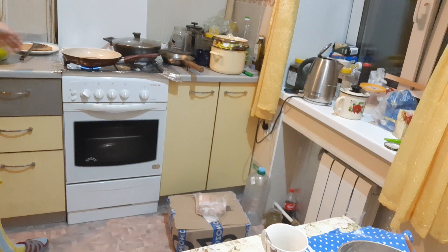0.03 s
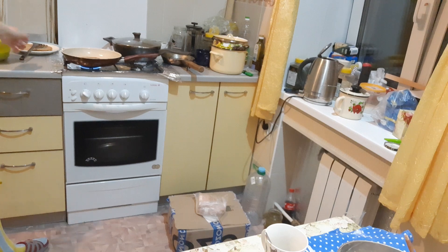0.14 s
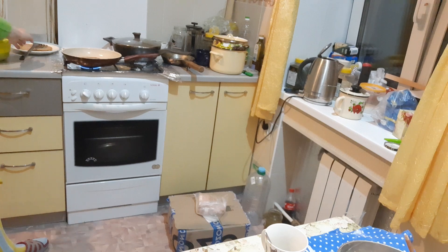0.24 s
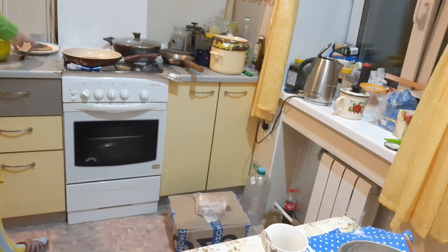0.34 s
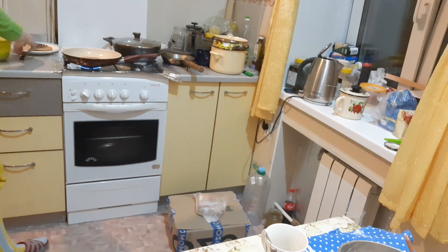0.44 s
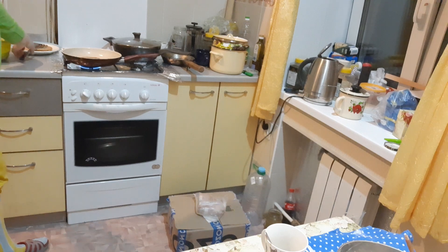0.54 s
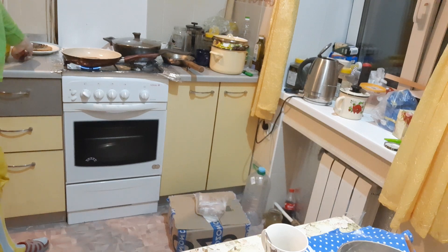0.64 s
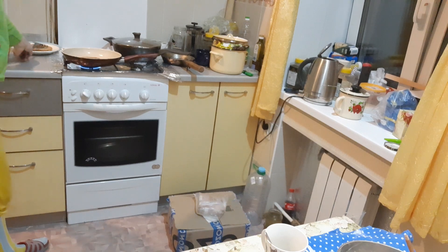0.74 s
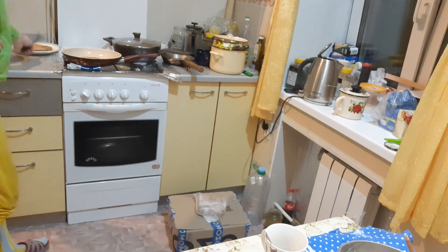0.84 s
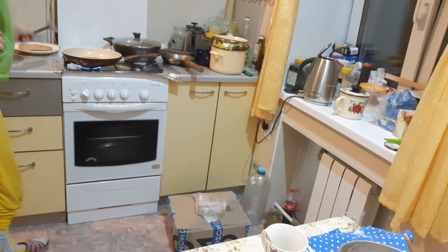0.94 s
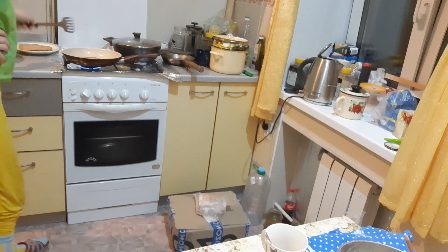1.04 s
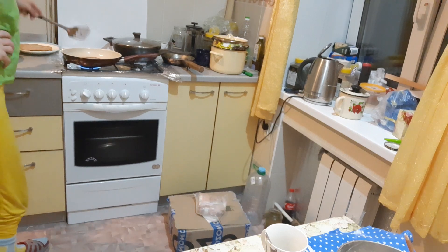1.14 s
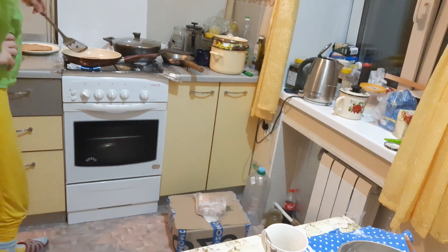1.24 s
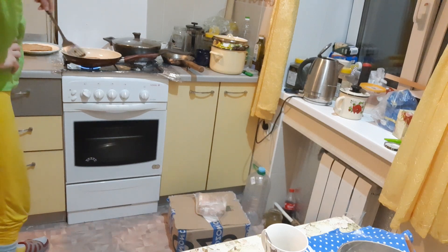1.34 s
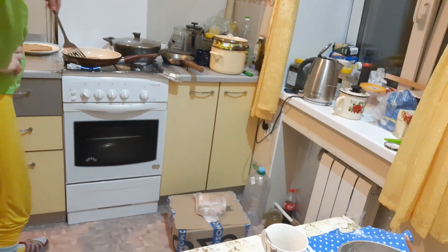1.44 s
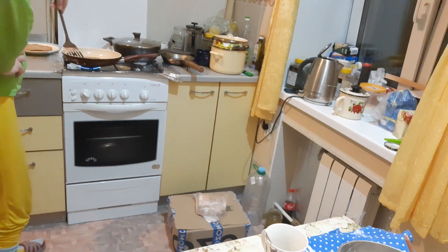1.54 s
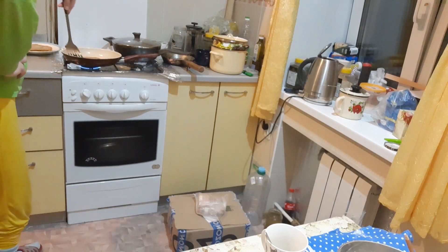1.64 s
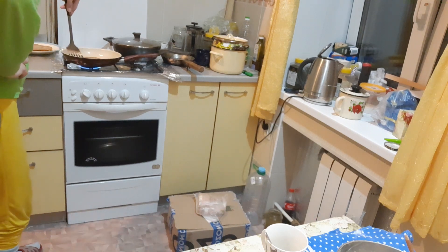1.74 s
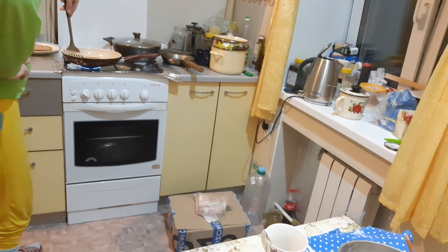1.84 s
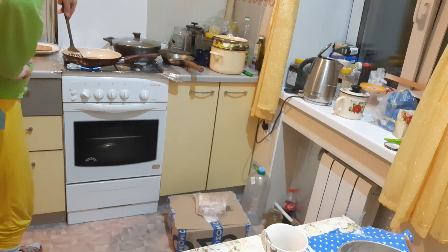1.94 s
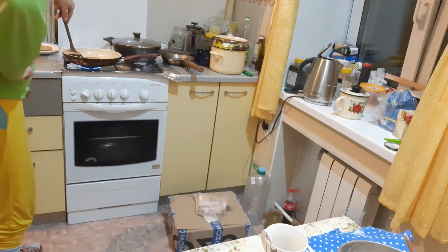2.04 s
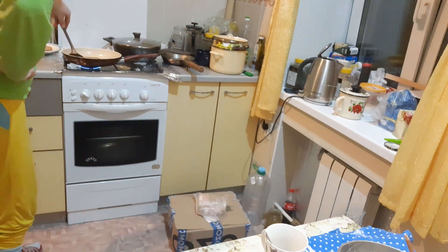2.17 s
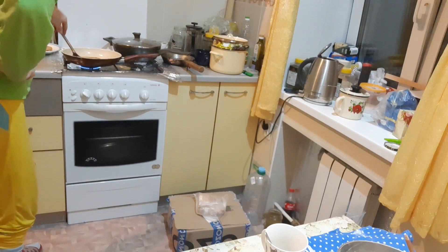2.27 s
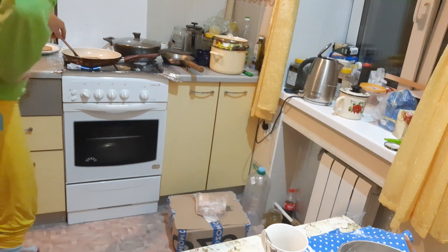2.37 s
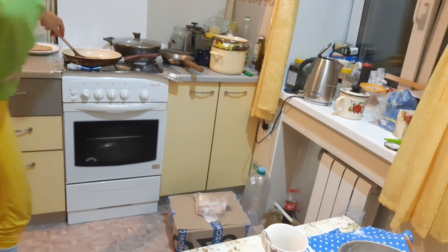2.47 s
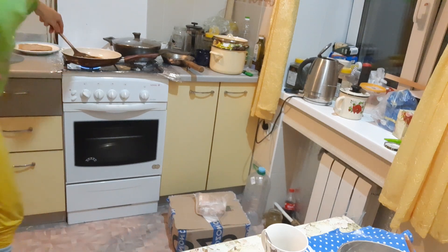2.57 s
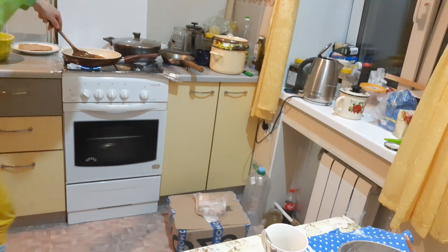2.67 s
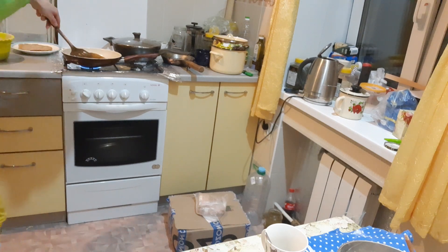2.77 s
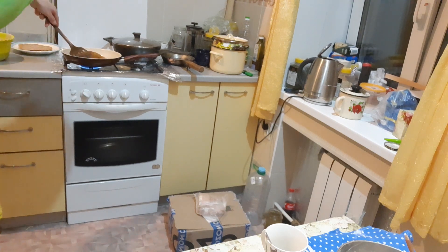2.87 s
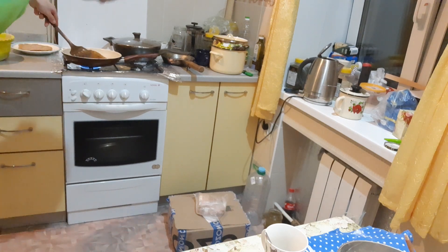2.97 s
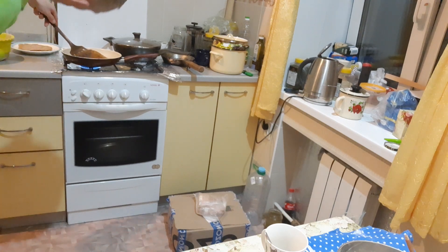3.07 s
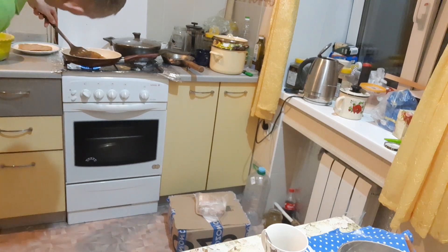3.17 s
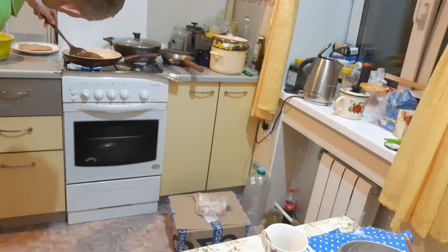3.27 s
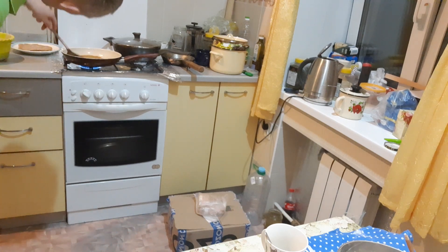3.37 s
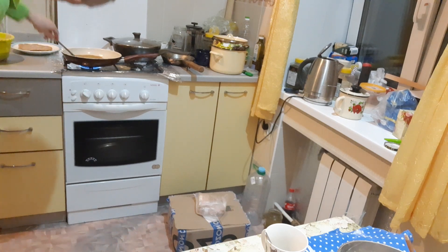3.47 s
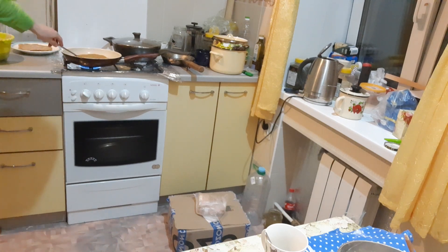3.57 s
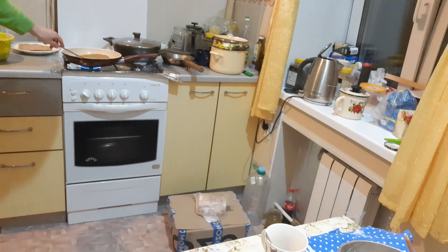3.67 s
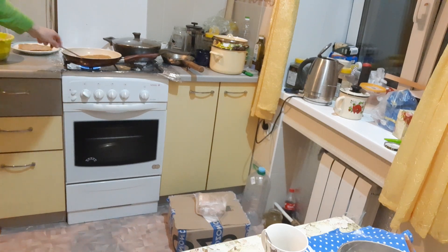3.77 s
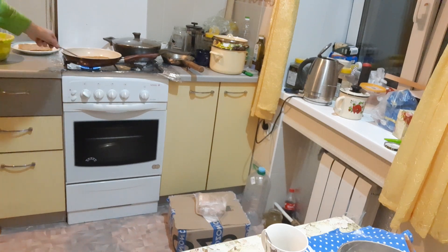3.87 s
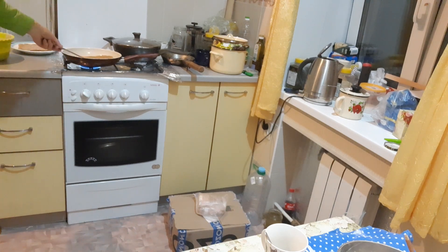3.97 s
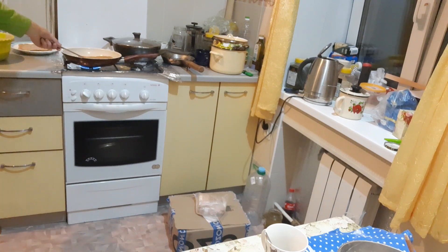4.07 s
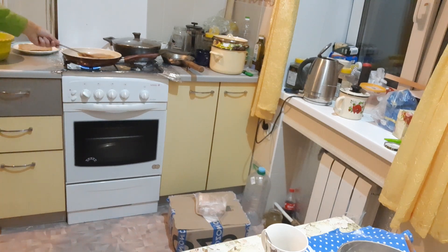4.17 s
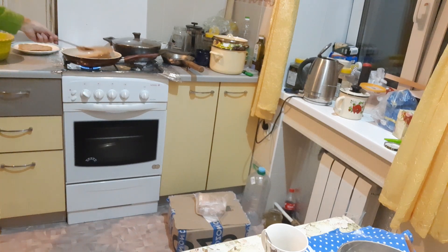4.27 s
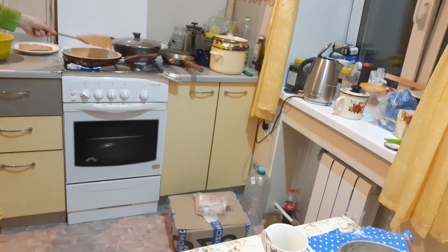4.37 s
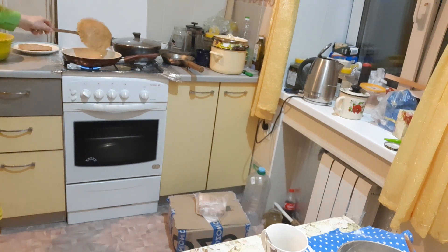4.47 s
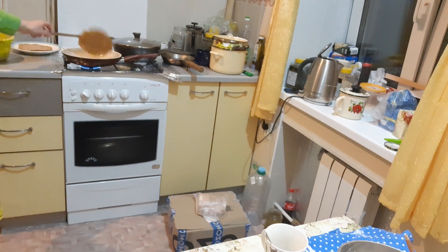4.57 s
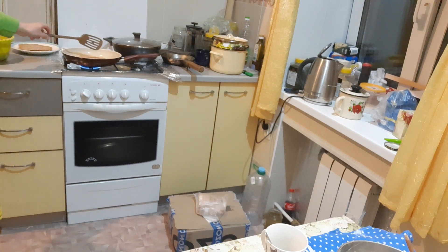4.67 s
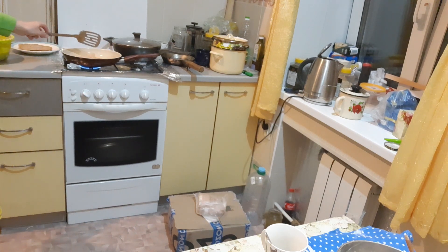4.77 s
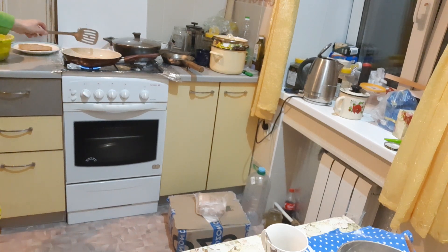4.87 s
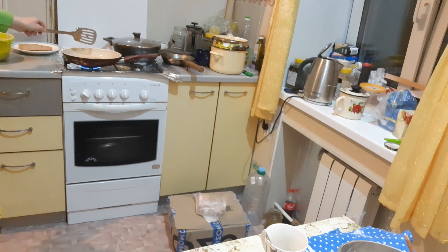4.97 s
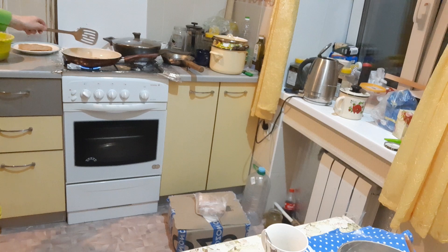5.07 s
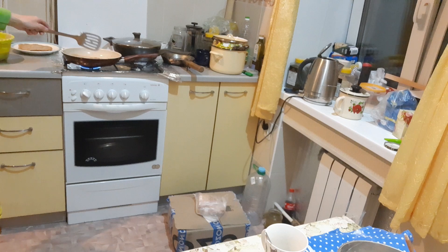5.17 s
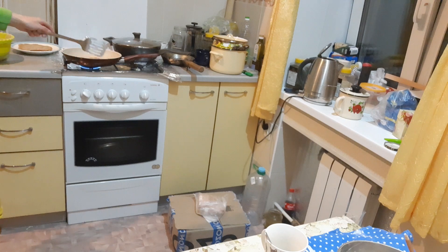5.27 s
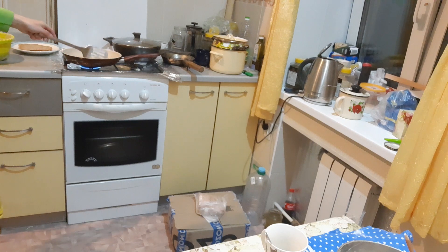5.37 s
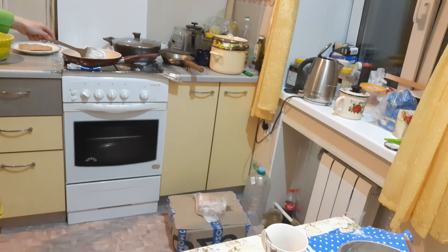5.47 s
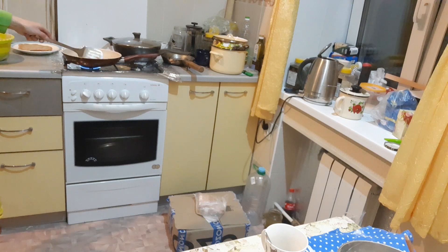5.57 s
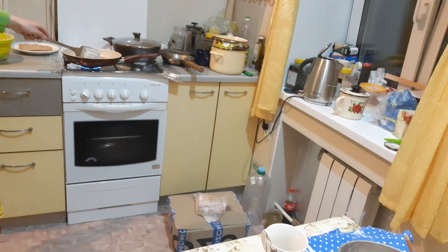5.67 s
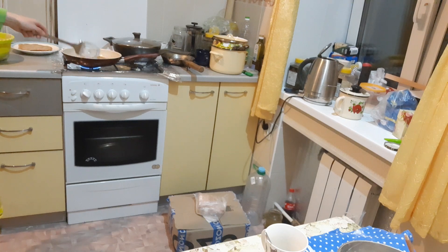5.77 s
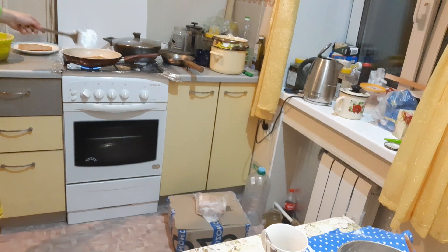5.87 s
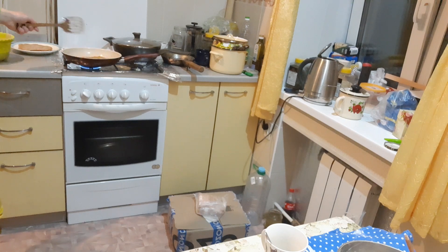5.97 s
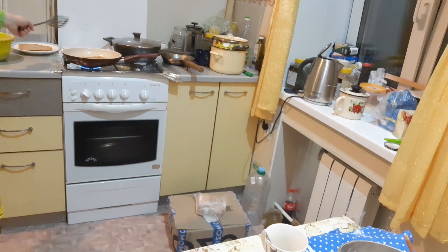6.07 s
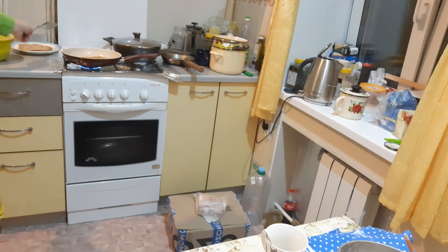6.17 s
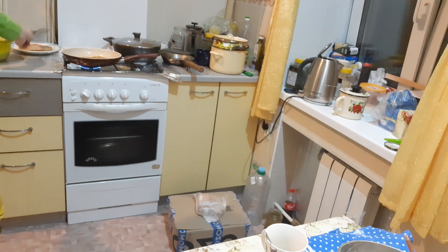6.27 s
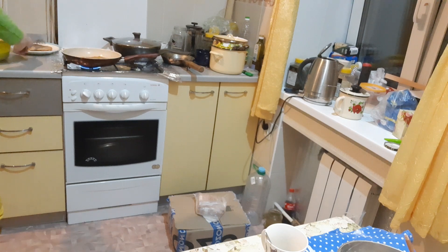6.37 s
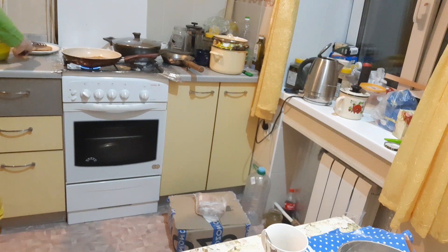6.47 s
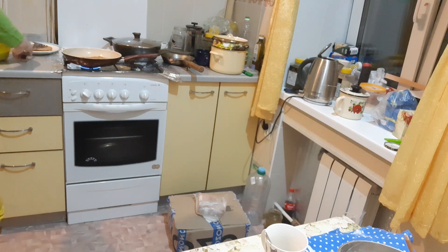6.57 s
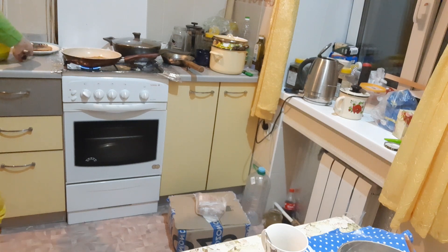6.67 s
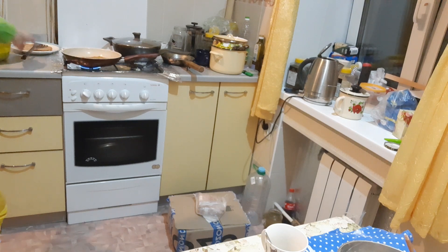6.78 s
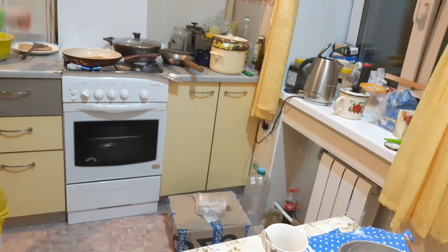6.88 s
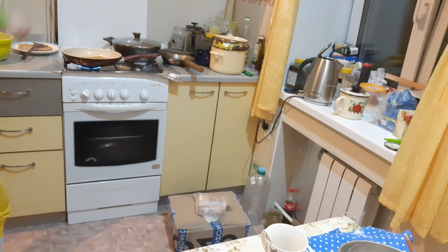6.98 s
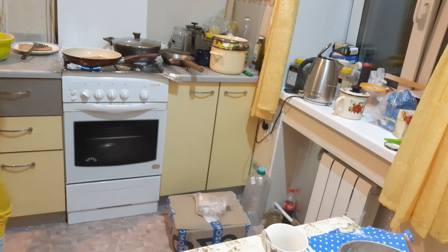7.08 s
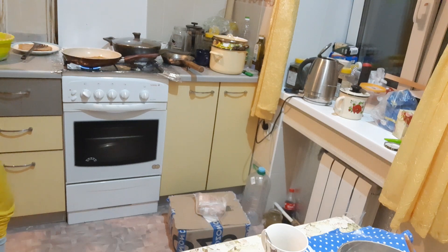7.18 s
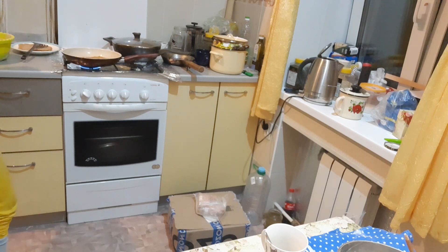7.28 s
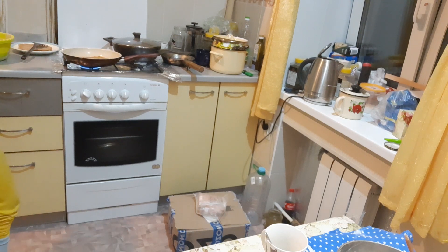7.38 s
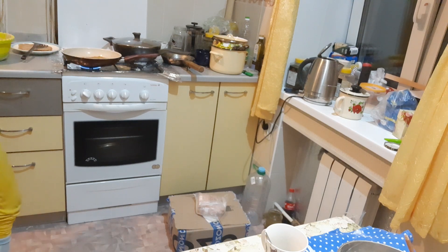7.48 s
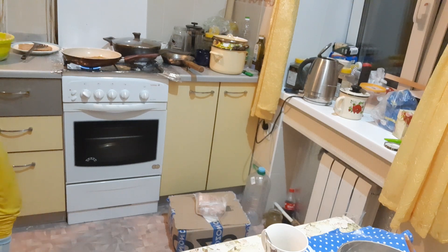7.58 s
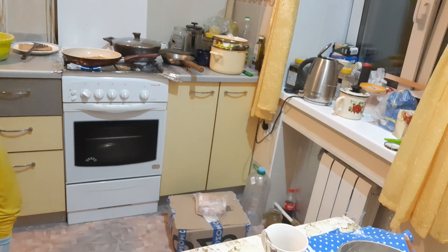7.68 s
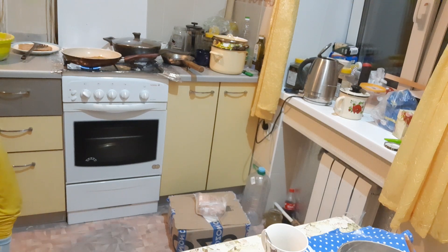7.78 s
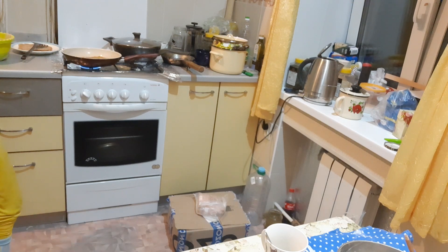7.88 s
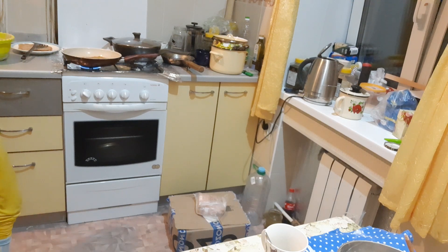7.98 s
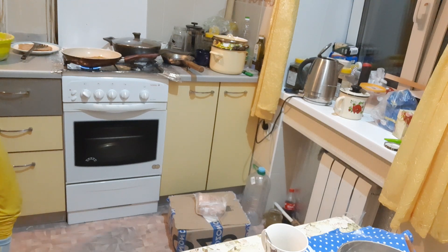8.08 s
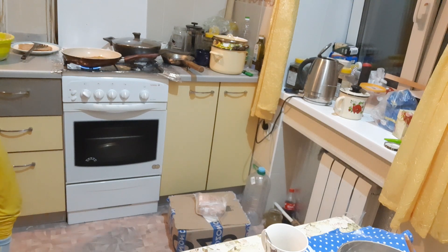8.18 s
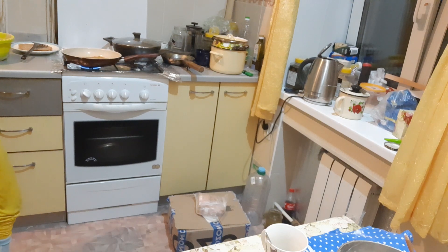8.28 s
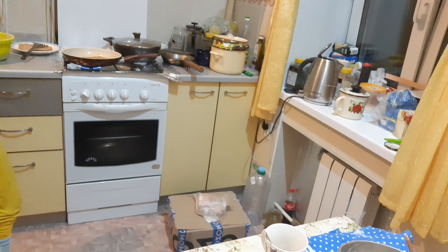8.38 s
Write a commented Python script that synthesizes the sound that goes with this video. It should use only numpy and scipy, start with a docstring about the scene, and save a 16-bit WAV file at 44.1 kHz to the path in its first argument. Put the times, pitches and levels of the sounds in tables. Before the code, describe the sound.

A pancake frying in a home kitchen: light crackly sizzle, quiet house hum, dull thuds of feet. A thin metal spatula taps and scrapes the pan in short gritty strokes, with sharp spits of fat, then flips the pancake with a scrape, slap and burst of hiss. A hard bright tap on the pan, one more scrape, a ceramic clack as it is put down, then only frying. Near stereo pickup, short live room.

```python
"""Fat sizzles close by in a small hard-walled kitchen, over the house's low rumble and the thuds of feet.
Drops spit; a steel spatula scrapes under a frying pancake, knocks the pan, turns it and is laid on a plate.
Sizzle and scraping are dense random grains, spits are noisy cracks, hits and thuds ring damped modes.
Near echoes and diffuse tails set them in the kitchen; a two-channel microphone colours everything."""
import sys
import numpy as np
from scipy import signal
from scipy.fft import rfft, irfft, next_fast_len
from scipy.io import wavfile

SR = 44100
rng = np.random.default_rng(int(sys.argv[2]) if len(sys.argv) > 2 else 0)


def generate_wav(signal):
    """Clip the signal to [-1, 1] and save it as 16-bit WAV at the path in sys.argv[1]."""
    frames = np.transpose(np.atleast_2d(signal))
    scaled = np.clip(frames, -1, 1) * 32767
    pcm = np.round(scaled).astype(np.int16)
    wavfile.write(sys.argv[1], SR, pcm)


N = 371093

# Ringing modes of the frying pan. Each row: frequency in Hz, level in dB, free 60 dB decay time in seconds.
PAN_MODES = [(470, -46.5, 0.81), (630, -38.5, 0.1), (843, -26, 0.084), (998, -52, 0.35),
             (1409, -14.5, 0.55), (1999, -8.5, 0.24), (2550, -41, 0.077), (2990, -31, 0.13),
             (3930, -9, 0.084), (4820, -6, 0.27), (4976, 7, 0.26), (5600, -37, .05), (8600, 2, 0.12),
             (9600, -8, 0.066), (11400, -14, 0.042)]
# Ringing modes of the steel spatula blade. Each row: frequency in Hz, level in dB, free 60 dB decay in seconds.
BLADE_MODES = [(2870, -16, 0.41), (3300, -13.5, 0.69), (3830, 4, 0.3), (4700, -14, 0.037),
               (5760, 12.5, 0.1), (6500, 3.5, 0.1), (6810, 12, 0.076), (7460, 11, 0.05), (8100, -6, 0.26),
               (10700, -18, .1), (9950, -15, 0.027), (11480, -0.5, 0.037)]
# Reflections off wall and worktop. Each row: delay in seconds, level in dB against the direct sound.
NEAR_ECHOES = [(.0035, -5.5), (.0058, -8)]


def from_db(db):
    """Decibels to gain."""
    return 10 ** (np.asarray(db) / 20)


def rms_one(x):
    """Scale to rms 1."""
    return x / np.sqrt(np.mean(x ** 2) + 1e-20)


def spectrum_hz():
    """Frequencies of the spectrum of the whole scene, kept above zero for the logarithm."""
    return np.maximum(np.arange(N // 2 + 1) * SR / N, 1)


def coloured(x, spectrum):
    """Shape a dense sound by a curve of (Hz, dB) points, straight over log frequency, at rms 1."""
    hz, level_db = np.transpose(spectrum)
    gain = from_db(np.interp(np.log(spectrum_hz()), np.log(hz), level_db))
    return rms_one(irfft(rfft(x) * gain, N))


def band(x, low_hz, high_hz):
    """Band-pass."""
    edges = [low_hz, min(high_hz, SR / 2.2)]
    return signal.sosfilt(signal.butter(2, edges, "band", fs=SR, output="sos"), x)


def ring(clicks, hz, t60):
    """A two-pole resonator: a unit click starts a dying sine of initial height 1."""
    radius = from_db(-60 / (t60 * SR))
    angle = 2 * np.pi * hz / SR
    feedback = [1, -2 * radius * np.cos(angle), radius ** 2]
    return signal.lfilter([0, np.sin(angle)], feedback, clicks + 1e-18)


def grains(per_s, spread_db):
    """Random clicks of either sign and uneven size, at rms 1."""
    sizes = from_db(spread_db * np.minimum(rng.exponential(1, N), 6)) * rng.choice([-1, 1], N)
    return rms_one(sizes * (rng.random(N) < per_s / SR))


def add(out, s, sound):
    """Mix a short sound in at time s."""
    i = round(s * SR)
    out[i:i + len(sound)] += sound[:N - i]


def crack(level_db, hz, width, puff, t60):
    """A click and a dying puff of noise in a band about hz, scaled to its peak level."""
    t = np.arange(2048) / SR
    burst = puff * rng.standard_normal(len(t)) * from_db(-60 * t / t60) * (1 - np.exp(-t / 0.0026))
    burst[0] = 1
    ratio = max(width, 1.2)
    sound = band(burst, hz / ratio, hz * ratio)
    return from_db(level_db) * sound / np.abs(sound).max()


def stereo_noise(count):
    """Two channels of noise, independent in the treble and partly shared in the bass."""
    alike_below_hz = 355
    shared, left, right = rng.standard_normal((3, count))
    low = signal.butter(4, alike_below_hz, fs=SR, output="sos")
    channels = []
    for own in (left, right):
        swap_bass = signal.sosfiltfilt(low, 1.17 * shared - own)
        own_bass = 0.91 * signal.sosfiltfilt(low, own)
        channels.append(own + swap_bass + own_bass)
    return np.array(channels)


def house_rumble():
    """The steady background of the house: noise weighted toward the low end."""
    # Spectrum of the background. Each row: frequency in Hz, relative density in dB per Hz.
    rumble_colour = [(15, -24), (25, -9.5), (106, 6.5), (248, -6.5), (604, -5.5), (672, -10), (814, -2.5),
                     (1030, -11.5), (1300, -5), (1750, -14.5), (2730, -4.5), (3100, -13), (4000, -0.5),
                     (5200, -34), (8800, -120)]
    rumble_db = -70.5
    return from_db(rumble_db) * coloured(stereo_noise(N), rumble_colour)


def sizzle_level_db(s):
    """How hard the fat fries at time s."""
    # Level of the frying. Each row: time in seconds, sizzle level in dB.
    frying = [(0.0, -59), (2.5, -59.5), (3.0, -56), (3.5, -54.5), (3.9, -48.5), (4.12, -53.5), (4.55, -63),
              (4.8, -42.5), (5.1, -56), (5.6, -59), (5.88, -50), (6.0, -51.5), (7.0, -54.5), (8.41, -54)]
    return np.interp(s, *np.transpose(frying))


def sizzle():
    """Tiny steam bubbles burst in the fat, in clumps: dense grains with a flickering level."""
    # Spectrum of the bubbles. Each row: frequency in Hz, relative density in dB per Hz.
    bubble_colour = [(290, -55), (500, -16.5), (553, -51), (831, -16), (1690, -16), (2390, -11),
                     (3110, -7.5), (6800, -1), (8210, -3.5), (11600, -4.5), (16000, -3)]
    clumps_db = 1.5 * rms_one(band(rng.standard_normal(N), 5, 30))
    bubbles = coloured(grains(per_s=5000, spread_db=4.0), bubble_colour)
    return from_db(sizzle_level_db(np.arange(N) / SR) + clumps_db) * bubbles


def thuds():
    """A soft push rings a low mode, with a dull rattle about it; a jolt pushes every panel of the stove."""
    # Feet and the pan on its grate. Each row: start in seconds, level in dB, body frequency in Hz,
    # 60 dB decay time in seconds.
    pushes = [(.11, -60.5, 317, 0.85), (.35, -62, 688, 0.16), (0.668, -55, 168, 0.16),
              (.74, -59, 470, 0.14), (.95, -65, 1135, 0.13), (1.037, -46.5, 100, 0.27),
              (1.074, -38.5, 74.5, 0.18), (1.313, -62.5, 358, 0.24), (1.413, -62.5, 216.6, 0.77),
              (1.819, -52, 278, 0.24), (1.963, -50.5, 422, 0.2), (2.005, -31.5, 139, 0.11),
              (2.01, -41, 417, 0.1), (2.012, -45, 955, 0.073), (3.63, -65, 452, 0.27)]
    # Jolts to the stove. Each row: time in seconds, level in dB.
    jolts = [(1.72, -59.5), (4.76, -45.5), (5.44, -43), (6.465, -59.5), (6.525, -61), (6.64, -42.5)]
    # Panels of the stove. Each row: frequency in Hz, level in dB against the jolt,
    # 60 dB decay time in seconds, lag after the jolt in seconds.
    stove_panels = [(117.6, 3, 0.26, .025), (298, -2.5, 0.29, .001), (413.6, -15.5, 0.42, 0.0015),
                    (555, -11.5, 0.42, .01), (950, -9.5, 0.25, 0.011)]
    panels = [(s + lag, db + mode_db, hz, t60) for s, db in jolts for hz, mode_db, t60, lag in stove_panels]
    out, t = np.zeros(N), np.arange(SR // 2) / SR
    soft_onset = 1 - np.exp(-t / 0.0097)
    for s, level_db, hz, t60 in pushes + panels:
        rattle = rms_one(band(rng.standard_normal(len(t)), hz / 1.84, hz * 1.37))
        body = np.sin(2 * np.pi * hz * t) + np.sqrt(hz / 900) * rattle   # higher bodies rattle more
        add(out, s, from_db(level_db - 60 * t / t60) * soft_onset * body)
    return out


def spitting():
    """Each drop of water bursts with a sharp crack and a short spray; small ones come at random times."""
    # The bigger drops. Each row: time in seconds, peak level in dB, centre frequency in Hz.
    drops = [(0.3426, -41, 4860), (2.852, -34, 4680), (3.0041, -34.5, 5860), (3.1083, -26.5, 11800),
             (3.1195, -26, 13000), (3.24, -18, 7900), (3.28, -14, 7640), (3.693, -28, 4850),
             (3.728, -25, 5500), (3.7736, -27, 6110), (3.835, -28.5, 4850), (3.858, -28.5, 6750),
             (3.8738, -22, 7410), (3.903, -23.5, 6000), (3.9379, -27, 3680), (3.996, -23, 5040),
             (4.0206, -30, 7460), (4.048, -32, 6080), (4.3067, -28.5, 6050), (4.4617, -36, 11200),
             (4.5072, -35.5, 13300), (4.973, -31.5, 4930), (5.102, -27, 12900), (5.1638, -21, 11700),
             (5.6776, -22, 12200), (5.7696, -29, 6200), (5.844, -37, 5800), (5.9286, -36, 5600),
             (6.012, -38, 6260), (6.3062, -35.5, 6040), (6.4399, -38, 6240), (6.547, -33, 6810),
             (6.925, -36, 4750), (7.044, -29, 3870), (7.6033, -33.5, 11600), (7.851, -36.5, 5420),
             (7.8986, -30.5, 3870), (8.1496, -39, 6800)]
    small_per_s, small_most_db = 6, 13   # small drops: rate, and greatest rise over the sizzle level
    base_width, wider_when_low = 2.28, 0.32   # band edge ratio at 6000 Hz; its growth toward low pitch
    spray_db = -16.5   # noise against the click, before both are filtered
    when, size, pitch = rng.random((round(small_per_s * N / SR), 3)).T
    small_s = when * N / SR
    small_db = sizzle_level_db(small_s) + small_most_db * size
    small_drops = list(zip(small_s, small_db, 4000 * 2 ** pitch))
    out = np.zeros(N)
    for s, level_db, hz in drops + small_drops:
        width = base_width * (6000 / hz) ** wider_when_low
        add(out, s, crack(level_db, hz, width, puff=from_db(spray_db), t60=0.022))
    return out


def scraping():
    """The edge catches on the pan bottom: grit in three registers, pan modes humming, blade modes singing."""
    # Spatula strokes. Each row: hardest moment in seconds, grit level in dB, swell time in seconds,
    # dying time in seconds, then pan hum, low grit and bright edge in dB against the grit.
    strokes = [(1.064, -44.5, 0.062, 0.093, -25, -16, -2), (1.65, -47.5, .25, 0.16, -39, -11, -3),
               (1.84, -61.5, 0.054, 0.084, -0.5, -7, -15), (2.031, -56.5, 0.072, 0.27, 5.5, 1, -4.5),
               (2.62, -44.5, 0.48, 0.2, -24, -12.5, -3), (2.87, -56.5, 0.045, 0.21, -37, -10, -5),
               (3.119, -51, 0.054, 0.054, -27, -29, -5), (3.21, -47, 0.038, 0.059, -24, -20, -2),
               (3.248, -37.5, 0.03, 0.057, -37, -20, 3.5), (3.288, -44, 0.03, 0.041, -35, -9, 5),
               (3.56, -43, 0.19, .12, -19.5, -17.5, -1.5), (3.76, -45.5, 0.13, 0.042, -26, -13, 2.5),
               (3.93, -46.5, 0.12, 0.064, -14.5, -14, -6), (4.01, -53.5, .03, 0.19, -31, -28, -8),
               (4.721, -39, 0.049, 0.073, -1, -4, 1), (4.81, -42, 0.047, 0.086, -15, -11, -25),
               (4.98, -67, 0.048, 0.042, -3, -7, 13), (5.69, -48.5, 0.14, 0.11, -21, -12.5, -0.5)]
    # Spectrum of the grit. Each row: frequency in Hz, relative density in dB per Hz.
    grit_colour = [(350, -60), (600, 5.5), (823, -1), (1260, 4.5), (1980, 3), (3210, -3.5), (4340, 1),
                   (7210, -1.5), (8160, -11), (13800, -27), (16000, -19)]
    fade_db, roundness = 19.5, 1.79   # fade over one swell or dying time; 1 is pointed, 2 rounded
    judder_db, squeal_db = 2, -14.5   # rms of the stick-slip flutter; singing blade against the grit
    t = np.arange(0, N + 64, 64) / SR
    s, grit_db, swell_s, dying_s, *colour_db = np.transpose(strokes)[:, :, None]
    away = np.where(t < s, (s - t) / swell_s, (t - s) / dying_s)
    pressure_db = grit_db - fade_db * away ** roundness

    flutter_db = judder_db * rms_one(band(rng.standard_normal(N), 10.7, 68))
    catches = from_db(flutter_db) * grains(per_s=7000, spread_db=2.5)
    grit = coloured(catches, grit_colour)
    # the modes die sooner here than when ringing free
    hum = sum(from_db(db) * ring(catches, hz, 0.44 * t60) for hz, db, t60 in PAN_MODES[:4])
    squeal = sum(from_db(db) * ring(catches, hz, 0.63 * t60) for hz, db, t60 in BLADE_MODES)
    main_grit = rms_one(band(grit, 2515, 7800)) + from_db(squeal_db) * rms_one(squeal)
    low_grit = band(grit, 1070, 3900)
    bright_edge = band(grit, 9650, 17500)

    out = np.zeros(N)
    for layer, against_db in zip([main_grit, hum, low_grit, bright_edge], [0] + colour_db):
        gain = np.sqrt(from_db(2 * (pressure_db + against_db)).sum(axis=0))   # strokes add in power
        out += np.interp(np.arange(N) / SR, t, gain) * rms_one(layer)
    return out


def hits():
    """Each hit gives a noisy crack and strikes every mode of the pan, blade or plate."""
    # Knocks, the pancake's slap and blade squeaks. Each row: time in seconds, crack peak in dB,
    # crack frequency in Hz, what rings, ring strength in dB.
    hit_rows = [(1.406, -42.5, 6300, "pan", -55.5), (1.705, -30.5, 8040, "pan", -47.5),
                (1.727, -58, 6150, "pan", -50), (1.811, -43, 4000, "pan", -63.5),
                (1.943, -43.5, 4930, "pan", -59.5), (2.719, -41, 4000, "pan", -65),
                (3.193, -40.5, 3050, "pan", -62), (3.515, -53, 5000, "blade", -68),
                (3.533, -60, 5000, "blade", -61), (3.555, -60, 4400, "blade", -65.5),
                (4.698, -31, 4000, "pan", -59), (4.748, -23, 3270, "blade", -69),
                (4.799, -33.5, 6000, "blade", -56.5), (5.426, -18, 6780, "blade", -50.5),
                (5.436, -24.5, 3600, "blade", -76), (6.640, -31, 4400, "plate", -37.5),
                (6.653, -24, 2250, "plate", -38.5), (7.312, -41, 4130, "plate", -57.5)]
    # Ringing modes of the plate. Each row: frequency in Hz, level in dB, 60 dB decay time in seconds.
    plate_modes = [(880, -28, 0.77), (1420, -24, 0.32), (1800, -13, 0.28), (1906, 0, 0.096),
                   (1980, -8, 0.14), (2610, -24, 0.092), (3100, -25, .08), (3240, -22, 0.067),
                   (3465, -4.5, 0.087), (3484, -2, 0.11), (3980, -5, 0.3), (4480, -9, 0.11),
                   (5130, -4, 0.084), (6200, -12, 0.067), (6450, -11, 0.036), (10200, -23, .06),
                   (11200, -27, 0.034)]
    cracks, rings = np.zeros(N), np.zeros(N)
    for s, level_db, hz, *_ in hit_rows:
        add(cracks, s, crack(level_db, hz, width=2.15, puff=0.86, t60=0.016))
    for name, modes in (("pan", PAN_MODES), ("blade", BLADE_MODES), ("plate", plate_modes)):
        s, strength_db = np.transpose([(row[0], row[-1]) for row in hit_rows if name in row])
        uneven_db = rng.normal(0, 1.0, (len(s), len(modes)))   # no two hits excite the modes alike
        for m, (hz, level_db, t60) in enumerate(modes):
            clicks = np.zeros(N)
            clicks[np.round(s * SR).astype(int)] = from_db(strength_db + level_db + uneven_db[:, m])
            rings += ring(clicks, hz, t60)
    return cracks, rings


def tail():
    """The diffuse answer of the kitchen to a click at one spot: builds up and dies, slower in the bass."""
    t60_s, bass_t60_s, build_s = 0.29, 0.32, 0.0035
    t = np.arange(SR // 2) / SR
    noise = stereo_noise(len(t))
    bass = signal.lfilter(*signal.butter(2, 500, fs=SR), noise)
    dying = (noise - bass) * from_db(-60 * t / t60_s) + bass * from_db(-60 * t / bass_t60_s)
    dying *= 1 - np.exp(-(t / build_s) ** 2)
    return dying / np.sqrt(np.mean(np.sum(dying ** 2, axis=1)))


def kitchen(layers, echoes, count):
    """Layers of (sound, tail dB) get direct sound, near echoes, and tails wandering among count spots."""
    left_lead_s = 0.0002   # sound reaches the left channel first
    size, lead = next_fast_len(N + SR // 2), round(left_lead_s * SR)
    near = np.zeros((2, SR // 20))
    for delay, level_db in [(0.00038, 0)] + echoes:
        near[[0, 1], round(delay * SR) + np.array([0, lead])] += from_db(level_db)
    out = rfft(sum(x for x, _ in layers), size) * rfft(near, size)
    far = sum(from_db(tail_db) * x for x, tail_db in layers)
    # a random spot every 1024 samples, crossfaded to the next
    spot = rng.integers(0, count, N // 1024 + 2)
    for k in range(count):
        share = np.interp(np.arange(N) / 1024, np.arange(len(spot)), spot == k)
        out += rfft(far * share, size) * rfft(tail(), size)
    return irfft(out, size)[:, :N]


def steady(x, tail_db):
    """A lasting sound whose level counts its echoes and tail in."""
    echo_power = sum(from_db(2 * level_db) for _, level_db in NEAR_ECHOES)
    power = 1 + echo_power + from_db(2 * tail_db)
    return x / np.sqrt(power), tail_db


def scene():
    """Everything sounds into the kitchen, over the house's steady rumble."""
    cracks, rings = hits()
    layers = [steady(sizzle(), tail_db=8.5), steady(scraping(), tail_db=13.0),
              (spitting(), 7), (cracks, 9), (rings, 3)]
    stove = kitchen(layers, NEAR_ECHOES, count=6)
    low = kitchen([(thuds(), -8)], [], count=1)   # thuds come direct, with a faint tail and no near echoes
    # hardly any sound below 70 Hz, apart from the rumble
    high_pass = signal.butter(3, 70, "high", fs=SR, output="sos")
    return signal.sosfilt(high_pass, stove + low) + house_rumble()


def record(dry):
    """The microphone colours the sound, a little differently in each channel, and cuts the top."""
    # Microphone response. Each row: frequency in Hz, colour in dB, left against right in dB.
    response = [(100, -4, 0.1), (1000, 1, 0), (4000, 3, -1.5), (7500, 3.5, -3), (7180, -2.5, 15),
                (9530, -3.5, -2.5), (11550, 3, 2), (16000, -2, 1.5)]
    cutoff_hz = 16200
    hz, colour_db, side_db = np.transpose(response)
    grid = np.log(spectrum_hz())
    gain_db = [np.interp(grid, np.log(hz), colour_db + way * side_db / 2) for way in (1, -1)]
    heard = irfft(rfft(dry) * from_db(gain_db), N)
    return signal.sosfilt(signal.cheby2(16, 60, cutoff_hz, fs=SR, output="sos"), heard)


dry = scene()
out = record(dry)
generate_wav(out)
```